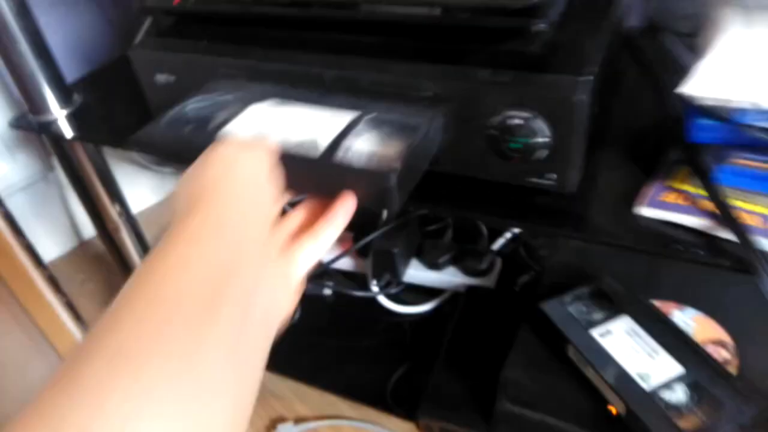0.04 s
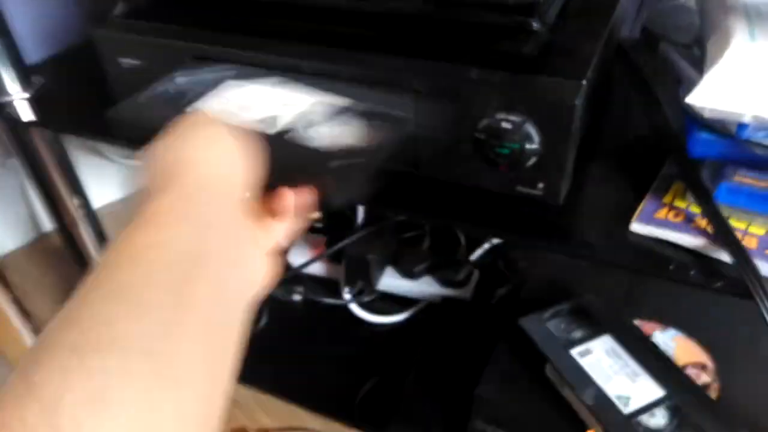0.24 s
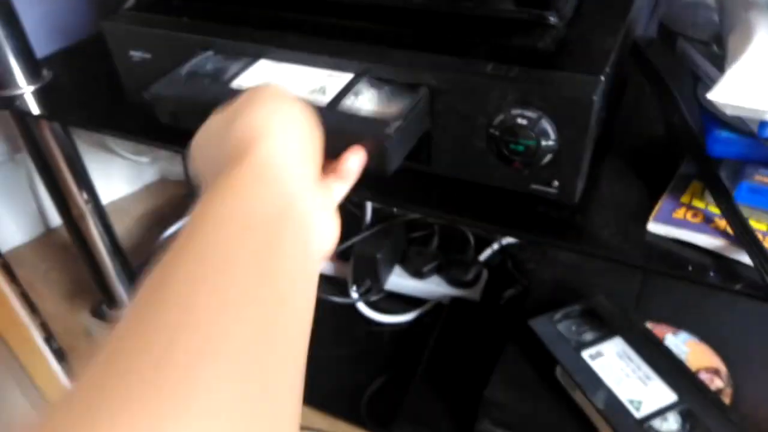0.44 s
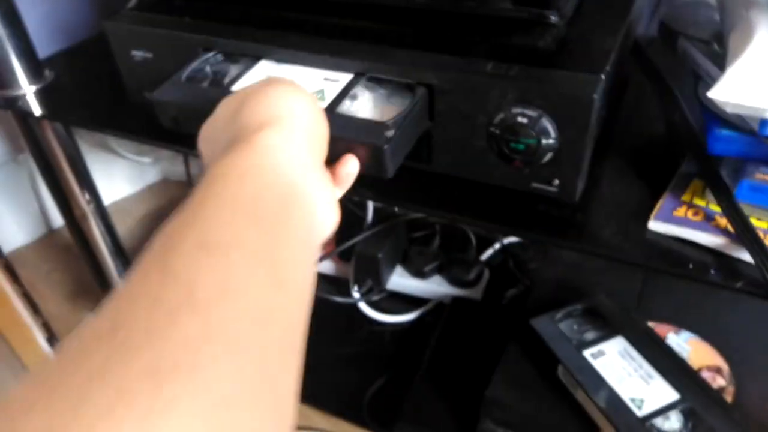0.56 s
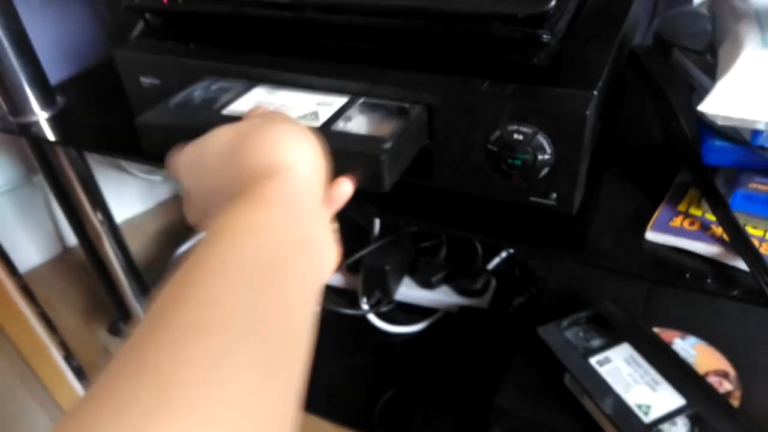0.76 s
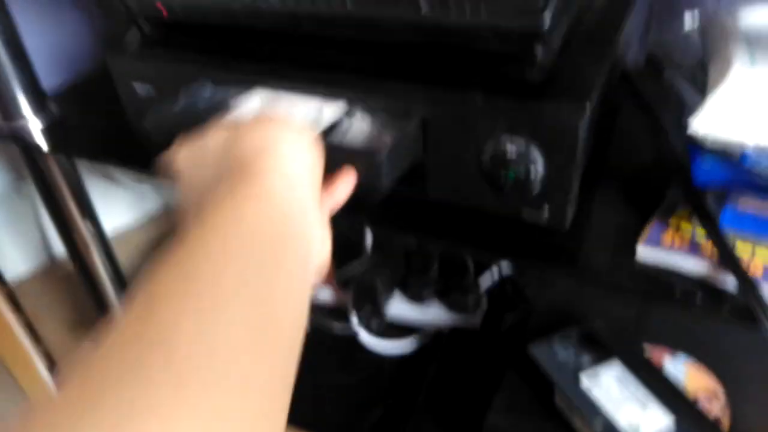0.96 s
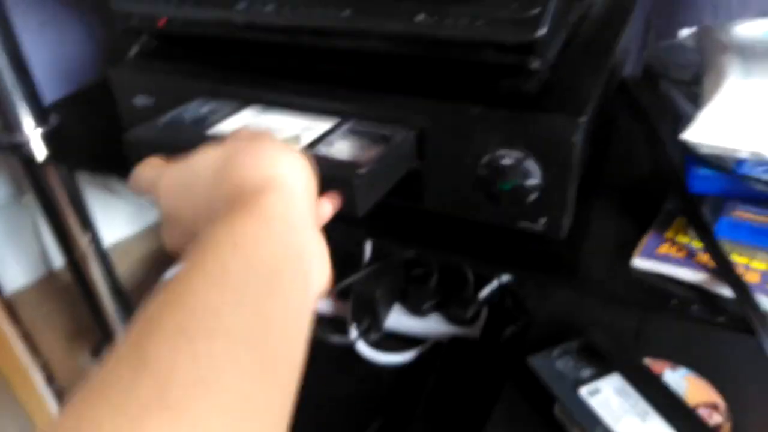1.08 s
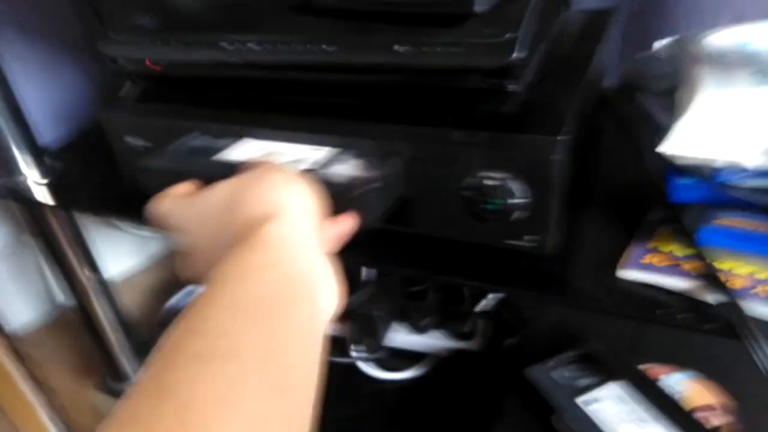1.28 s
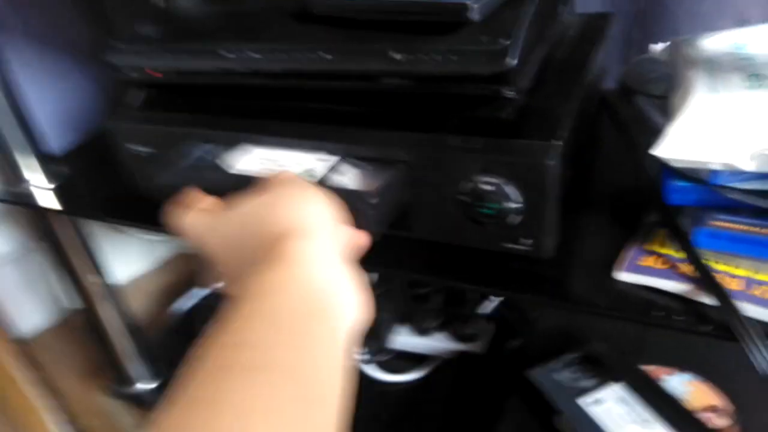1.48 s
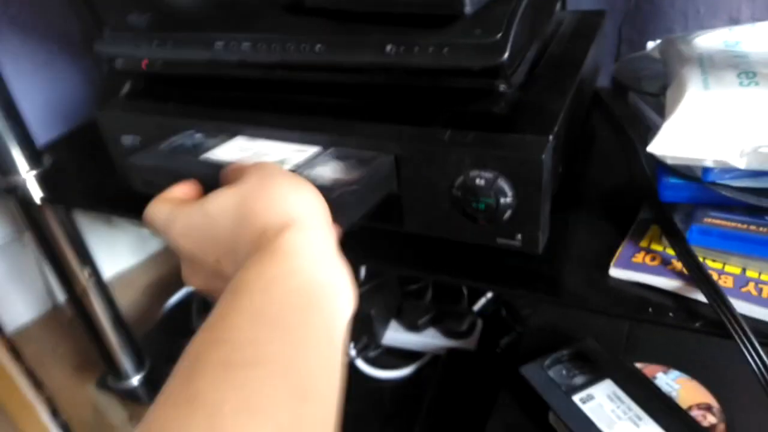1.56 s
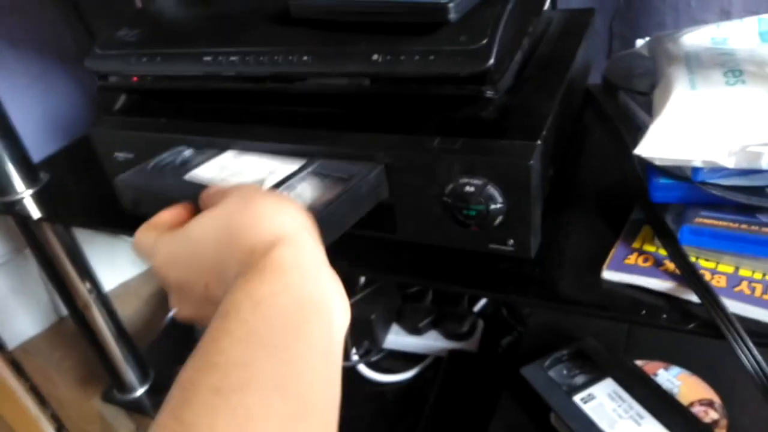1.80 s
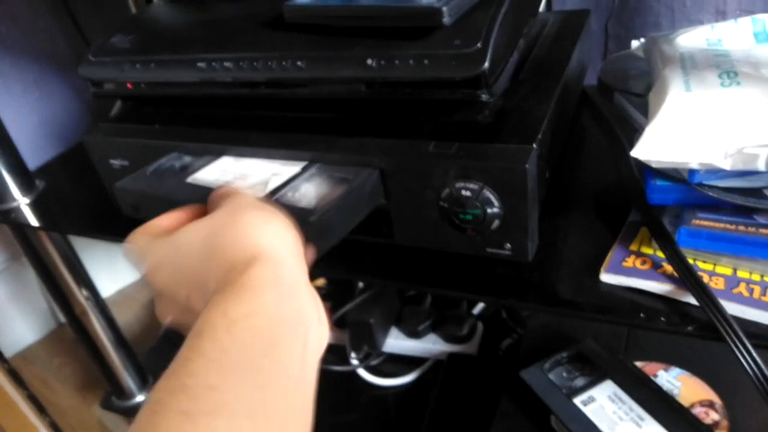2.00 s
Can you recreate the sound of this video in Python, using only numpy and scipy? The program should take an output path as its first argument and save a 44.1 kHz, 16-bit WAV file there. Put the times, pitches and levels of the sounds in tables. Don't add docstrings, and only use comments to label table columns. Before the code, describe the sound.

A video cassette is shoved repeatedly into a tape deck in a small room. After near quiet, hard plastic clacks burst at 0.23-0.32 seconds, then around 0.45, 0.6-0.67, 0.98, 1.3, 1.58, 1.8 and 2.0. Scraping peaks near 0.48; light reel and flap ticks fill gaps. The hollow case booms, low handling thumps intrude, faint mains hum continues. Close, overloaded right side; muffled left.

```python
import sys
import numpy as np
from scipy import signal
from scipy.fft import rfft, irfft, next_fast_len
from scipy.io import wavfile
from scipy.ndimage import uniform_filter1d

SR = 44100
rng = np.random.default_rng(int(sys.argv[2]) if len(sys.argv) > 2 else 0)


def generate_wav(signal):
    frames = np.transpose(np.atleast_2d(signal))
    scaled = np.clip(frames, -1, 1) * 32767
    pcm = np.round(scaled).astype(np.int16)
    wavfile.write(sys.argv[1], SR, pcm)


def nominal_scale(level):
    x = np.asarray(level, float) / 20
    return 10 ** x


N = 89875
TIME = np.arange(N) / SR
WHOLE_HZ = np.fft.rfftfreq(SR, 1 / SR)


def unit(x):
    return x / np.sqrt(np.mean(x ** 2) + 1e-20)


def since(start):
    return np.maximum(TIME - start, 0)


def along(points, hz):
    f, value = np.transpose(points)
    return np.interp(np.log(hz + 1), np.log(f + 1), value)


def filtered(x, response):
    m = next_fast_len(N + SR // 2)
    return irfft(rfft(x, m) * response(np.fft.rfftfreq(m, 1 / SR)), m)[..., :N]


def causal(points):
    def response(hz):
        cepstrum = irfft(np.log(np.maximum(nominal_scale(along(points, hz)), 1e-6)))
        half = len(cepstrum) // 2
        cepstrum[1:half] *= 2
        cepstrum[half + 1:] = 0
        return np.exp(rfft(cepstrum))
    return response


def resonant(x, modes):
    def body(f):
        total = 0
        for k, (center, width, db) in enumerate(modes):
            damping = 1j * f * width
            total = total + (-1) ** k * nominal_scale(db) * damping / (center * center - f * f + damping)
        return total
    return filtered(x, body) / np.sqrt(np.mean(np.abs(body(WHOLE_HZ)) ** 2))


# f/Hz, level/dB per Hz
RATTLE_COLOUR = [(710, -17.5), (1200, -8.5), (1460, -8.5), (2040, -9.5), (6100, -2), (8820, -11.5),
                 (14400, -20), (16000, -17.5)]
# f/Hz, width/Hz, level/dB
DEEP_RING = [(607, 64.4, 0.5), (665, 81.6, 6.5), (723, 104, -9)]
# f/Hz, width/Hz, level/dB
SHELL_RING = [(717, 162, -0.5), (933, 145, -6), (1220, 207, -1.5), (1347, 830, -10), (2290, 520, -13)]
# f/Hz, width/Hz, level/dB
DECK_OPEN = [(180.5, 36, -14.5), (241.4, 21.4, 1.5), (316, 142, -7.5)]
# f/Hz, width/Hz, level/dB
DECK_FILLED = [(238, 62, -4.5), (316.7, 26.2, 7), (417, 135, -10)]
# t/s, depth 0-1
DEPTH = [
    (.3, 0.04),
    (.47, 0.6),
    (.7, 0.27),
    (1.01, 0.62),
    (1.3, 0.87),
    (1.55, 0.98),
    (1.988, 0.85),
]


def cassette():
    rattle, ring, boom = efforts()

    contacts = rattle * struck(patchy(clacks(5000)), strike_db=-1.5)
    sharp_hz, sharp_grows = 9200, 0.46
    sharp = filtered(contacts, lambda f: 1 / (1 + (sharp_hz / (f + 1)) ** 6))
    contacts = contacts + sharp * ((rattle / rattle.max()) ** sharp_grows - 1)
    colour_rms = np.sqrt(np.mean(nominal_scale(along(RATTLE_COLOUR, WHOLE_HZ)) ** 2))
    bright = filtered(contacts, causal(RATTLE_COLOUR)) / colour_rms
    own = 0.98
    bright = np.array([np.sqrt(1 - own) * bright[1] + np.sqrt(own) * bright[0], bright[1]])

    knocks = clacks(3000)
    aside = 0.35
    covered = np.sqrt(1 - aside) * knocks[0] + np.sqrt(aside) * knocks[0, ::-1]
    first_blow_db = 13.5
    pair = struck(np.array([covered, knocks[0]]), first_blow_db)
    knocks = struck(knocks, first_blow_db)

    deep = ring * knocks[0] * (ring / ring.max()) ** 0.29
    shell = resonant(deep, DEEP_RING) + resonant(ring * pair, SHELL_RING)

    depth = np.interp(TIME, *np.transpose(DEPTH))
    push = boom * knocks[1]
    deck = resonant(push * np.sqrt(1 - depth), DECK_OPEN)
    deck = deck + resonant(push * np.sqrt(depth), DECK_FILLED)
    return bright + shell + deck


# t/s, peak level/dB, shell ring over rattle/dB,
# deck boom over rattle/dB, rattle t60/s
HITS = [(0.2305, -2.5, -14.5, -19.5, 0.14), (.241, -9.5, -14, -17, 0.5), (0.2559, -1.5, -39, -18.5, 0.22),
        (0.2764, -16, -0.5, -0.5, 0.11), (0.305, -11.5, -14.5, -10.5, 0.14),
        (0.3226, -5.5, -12.5, -13.5, 0.17), (0.4487, -11, -11.5, -13.5, 0.13),
        (0.4604, -10.5, -6.5, -9.5, 0.36), (0.6023, -6.5, -13, -10.5, 0.2),
        (0.637, -4.5, -12.5, -18.5, 0.2), (0.6652, -8, -7, -13.5, 0.16), (0.9744, -3, -14.5, -10, 0.14),
        (0.9833, -6.5, -14, -15.5, 0.32), (1.2787, -6, -12.5, -16.5, 0.3),
        (1.303, -2, -18.5, -11.5, 0.13), (1.5677, -6.5, -15, -9, 0.24), (1.577, -6, -13.5, -16.5, 0.3),
        (1.5932, -16.5, -14, 1, 0.12), (1.7959, -14, -33, -45, 0.77), (1.8108, -4.5, -12, -6.5, 0.15),
        (1.822, -10.5, -8, -5, 0.15), (1.8315, -8.5, -36, -16.5, 0.2), (2.02, -10, -23.5, -53, 0.83),
        (0.001, -43, -9.5, -9, 0.052), (0.023, -54, -29, -26, 0.087), (.203, -57, -20, -17, 0.093),
         (0.4105, -29, -5, -27, 0.4), (0.4805, -42, -16, -10, 0.09), (0.592, -18, -5, -17, 0.13),
         (0.7823, -34.5, 3, -9, 0.11), (0.83, -20, -4.5, -9.5, 0.14), (.8375, -20.5, -8.5, -18, 0.077),
         (0.911, -31.5, 2, -14, 0.08), (0.9303, -22, -5, -19, 0.11), (0.953, -22, -6.5, -13, 0.4),
         (.9655, -17, -18, -16.5, 0.15), (1.0683, -22, 0, 1.5, 0.051), (1.1469, -20.5, -7, -16, 0.36),
         (1.177, -13.5, -12, -4, 0.082), (1.2512, -24.5, -4.5, -29, 0.44), (1.3525, -13, -27, -39, 0.16),
         (1.4428, -19, -13, -40, 0.33), (1.451, -18, -22, -30, 0.066), (1.472, -19, -1, -21, 0.095),
         (1.4848, -12.5, -10, -13.5, 0.085), (1.49, -14, -9, -8, 0.049), (1.502, -30.5, -8, -8, 0.06),
         (1.5388, -22, -6, -23, 0.27), (1.565, -14.5, -7.5, -10, .1), (1.646, -26.5, -3, -3, 0.082),
         (1.6905, -35, 1.5, -21, 0.32), (1.722, -20, -8, -27, 0.11), (1.73, -22.5, -8.5, -23, 0.08),
         (1.7396, -19, -13, -15, 0.073), (1.746, -7, -27, -16, 0.028), (1.9044, -19.5, -14, -50, 0.2),
         (1.9535, -17, -13, -32, 0.077), (1.9573, -14, -19, -36, 0.045)]
# t/s, level/dB
SCRAPE = [(0.0, -57), (0.28, -108), (0.399, -29), (0.478, -12), (0.54, -33.5), (0.75, -40), (0.95, -68),
          (1.18, -37), (1.29, -64), (1.52, -41), (1.59, -28.5), (1.79, -34), (1.92, -40), (1.99, -60),
          (2.04, -61)]
CONTACTS = HITS
RING_RISE_S = 0.00122


def efforts():
    start, db, ring_db, boom_db, t60 = np.transpose(CONTACTS)[..., None]
    begun = TIME > start
    age = np.abs(TIME - start)
    slide = nominal_scale(np.interp(TIME, *np.transpose(SCRAPE)) - 2.5)
    slide_boom = nominal_scale(-15.5) * slide

    def loudness(top_db, t60_factor, rise_s, rest):
        fade = nominal_scale(top_db - 60 * age / (t60_factor * t60))
        each = begun * fade * (1 - np.exp(-age / rise_s))
        return np.sqrt((each ** 2).sum(0) + rest ** 2)

    attack_s = 0.0012 * nominal_scale(0.14 * np.clip(db.max() - db, 0, 30))
    rattle = loudness(db - 6.5, 0.96, attack_s, slide)
    ring = loudness(db + ring_db + 4, 0.8, RING_RISE_S, slide_boom)
    boom = loudness(db + boom_db + 3, 0.74, 0.0059, slide_boom)
    return rattle, ring, boom


def struck(knocks, strike_db):
    start = np.array([row[0] for row in CONTACTS])
    blows = np.zeros(N)
    blows[np.round((start + RING_RISE_S) * SR).astype(int)] = nominal_scale(strike_db)
    return knocks + blows


def clacks(per_second):
    hit = (rng.random((2, N)) < per_second / SR) * rng.standard_normal((2, N))
    spread_db = 1.5
    hit = unit(hit * nominal_scale(spread_db * rng.standard_normal((2, N))))
    hiss_db = 1.5
    return unit(hit + nominal_scale(hiss_db) * rng.standard_normal((2, N)))


def patchy(x):
    z = signal.stft(x, nperseg=256)[2]
    field = uniform_filter1d(rng.standard_normal(z.shape[1:]), size=8, axis=0)
    field = uniform_filter1d(field, size=5, axis=1)
    patch_db = 3
    return signal.istft(z * nominal_scale(patch_db * unit(field)), nperseg=256)[1][:, :N]


# t/s, peak level/dB, f/Hz, t60/s
FLAP = [(.329, -30, 1284, .05), (.8375, -30, 1230, 0.044), (0.9116, -19, 1324, 0.045),
        (.916, -26, 760, 0.044), (0.9324, -25, 1310, 0.032), (1.713, -34.5, 1220, 0.045),
        (1.732, -27, 1310, .05), (1.486, -19, 704, 0.058), (1.498, -29, 332, 0.086),
        (1.587, -19, 320, 0.083), (1.745, -35, 343, 0.078), (1.818, -18, 704, 0.091),
        (1.826, -22, 324, 0.097), (1.957, -31, 766, 0.042)]


def flap():
    start, db, hz, t60 = np.transpose(FLAP)[..., None]
    age = since(start)
    fade = nominal_scale(db + 3.5 - 60 * age / t60)
    swell = 1 - np.exp(-age * hz / 1.1)
    return (fade * swell * np.sin(2 * np.pi * hz * age)).sum(0)


# t/s, level/dB
TAPS = [
    (1.406, -24),
    (1.651, -24),
    (1.6842, -14),
]


def taps():
    start, db = np.transpose(TAPS)[..., None]
    age = since(start)
    tap_hz, t60, rise_s, right_db = 80, 0.089, 0.00048, -36
    size = nominal_scale(db - 60 * age / t60) * (1 - np.exp(-age / rise_s))
    snap = 1.1 * np.exp(-age / 0.00092)
    dip = -size * (np.cos(2 * np.pi * tap_hz * age) + snap)
    return dip.sum(0) * nominal_scale([[0], [right_db]])


# t/s, level/dB, f/Hz, t60/s
THUMPS = [(.27, -23.5, 108, 0.059), (0.338, -33, 130, 0.082), (.47, -17, 127, 0.081),
          (0.662, -29, 132, 0.15), (0.992, -37, 91, 0.21), (1.195, -19.5, 86, 0.09),
          (1.226, -30, 70, 0.074), (1.282, -17, 95, 0.08), (1.339, -21, 65.5, 0.15),
          (1.409, -33, 89.5, 0.044), (1.579, -48, 92, 0.17), (1.692, -42, 63.5, 0.12),
          (1.811, -48, 80, 0.12), (.495, -28, 70.4, 0.071), (.7, -33, 125, 0.11), (.76, -40, 165, 0.1),
          (1.31, -21, 120, 0.085), (1.865, -37, 80, .08)]


def thumps():
    start, db, hz, t60 = np.transpose(THUMPS)[..., None]
    age = since(start)
    rise_s, left_db = 0.013, 4
    size = nominal_scale(db - 60 * age / t60) * (1 - np.exp(-age / rise_s))
    turn = 1.86 * rng.standard_normal((len(start), 1))
    push = [(size * np.sin(2 * np.pi * hz * age + side * turn / 2)).sum(0) for side in (1, -1)]
    return push * nominal_scale([[left_db], [-left_db]])


def varied_tail(x, count=12):
    place = TIME * SR / N * (count - 1)
    total = 0
    for k in range(count):
        share = np.clip(1 - np.abs(place - k), 0, 1)
        total = total + room(x * np.sqrt(share))
    return total


# f/Hz, t60/s
ROOM = [(200, 0.36), (1500, 0.41), (6000, 0.28), (14000, 0.21)]


def room(x):
    hz, t, z = signal.stft(rng.standard_normal((2, SR // 2)), SR, nperseg=256)
    alike = 1 / (1 + (hz[:, None] / 860) ** 2)
    z = np.array([alike * z[1] + np.sqrt(1 - alike ** 2) * z[0], z[1]])
    fade = nominal_scale(-60 * t / along(ROOM, hz)[:, None])
    tail = signal.istft(z * fade, SR, nperseg=256)[1]
    wall_s = 0.0043
    tail = np.pad(tail, ((0, 0), (round(wall_s * SR), 0)))
    return signal.fftconvolve(x, tail / np.linalg.norm(tail[0]), axes=1)[:, :N]


# f/Hz (moved to the nearest multiple of the mains), level/dB rms
HUM = [(48.4, -45), (96.9, -79), (150.7, -63), (253.0, -75), (349.9, -78.5), (452.2, -86), (549.1, -101),
       (651.4, -89)]
# f/Hz, level/dB per Hz
FLOOR = [(100, -4.5), (300, -9), (700, -20), (1500, -21), (4600, -24), (5800, -26), (9000, -21),
         (16000, -31)]


def hum():
    mains_hz = 50.1
    tone = 0
    for hz, db in HUM:
        overtone_hz = round(hz / mains_hz) * mains_hz
        tone = tone + nominal_scale(db + 6.5) * np.sin(2 * np.pi * (overtone_hz * TIME + rng.random()))
    hiss = filtered(rng.standard_normal((2, N)), lambda hz: nominal_scale(along(FLOOR, hz)) * (hz > 60))
    return tone + nominal_scale(-69) * unit(hiss)


# f/Hz, level/dB
COVER = [(200, -2), (380, -3), (700, -7), (1290, -7), (2380, -10.5), (4400, -24), (8120, -27), (15000, -20)]


def scene():
    near = cassette() + flap()
    left, right = near + nominal_scale(-10.5) * varied_tail(near)
    lag_s = 0.00037
    left = filtered(left, lambda hz: nominal_scale(along(COVER, hz)) * np.exp(-2j * np.pi * hz * lag_s))
    return np.array([left, right]) * nominal_scale(2.5) + thumps() + taps() + hum()


# t/s, f/Hz
TOP = [(.25, 15900), (.3, 15100), (.74, 15300), (.77, 14300), (.83, 12300), (.885, 12300), (.9, 9300),
       (.955, 9300), (.965, 15950), (.985, 15950), (1.0, 15000), (1.13, 15100), (1.15, 15800),
       (1.185, 15100), (1.25, 15200), (1.27, 16000), (1.5, 15200), (1.56, 16000)]
# f/Hz, ratio
COARSE = [(7000, .6), (8500, 2), (11000, 2.4), (16000, 2.2)]


def coarsened(x):
    hz, t, z = signal.stft(x, SR, window="cosine", nperseg=2048)
    hz = hz[:-1, None]
    size = np.abs(z[:, :1024]) + 1e-9
    band = np.sqrt((size ** 2).reshape(2, 64, 16, -1).mean(axis=2))
    wander = unit(uniform_filter1d(rng.standard_normal(band.shape[1:]), size=3))
    step = np.repeat(band * nominal_scale(3 * wander), 16, axis=1) * along(COARSE, hz)

    level = np.sqrt((band ** 2).sum(axis=(0, 1)))
    steady = level < nominal_scale(10) * np.minimum(np.roll(level, 1), np.roll(level, 2))
    rounded = np.where((hz > COARSE[0][0]) & steady, np.round(size / step) * step / size, 1)

    over = hz > np.interp(t, *np.transpose(TOP))
    leftover = np.minimum(1, nominal_scale(-106) / np.repeat(band, 16, axis=1))
    z[:, :-1] *= rounded * np.where(over, leftover, 1)
    return signal.istft(z, SR, window="cosine", nperseg=2048)[1][:, :N]


def low_pass(x):
    return signal.sosfilt(signal.butter(12, 16180, fs=SR, output="sos"), x)


def record(dry):
    top, hardness = 0.94, 4
    clipped = dry / (1 + np.abs(dry / top) ** hardness) ** (1 / hardness)
    return low_pass(coarsened(clipped))


dry = scene()
out = record(dry)
generate_wav(out)
```